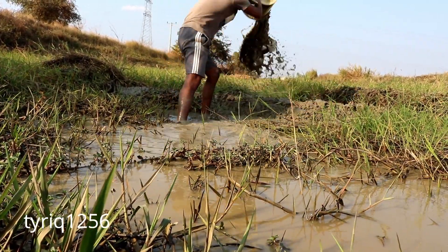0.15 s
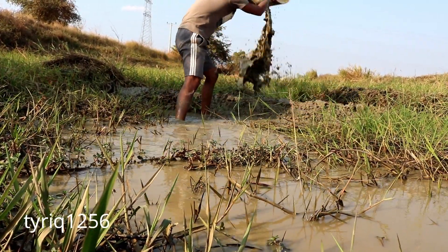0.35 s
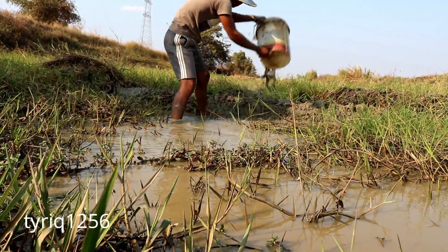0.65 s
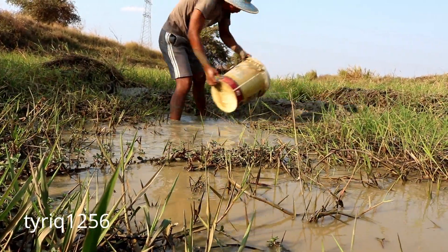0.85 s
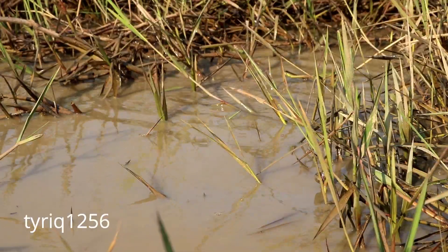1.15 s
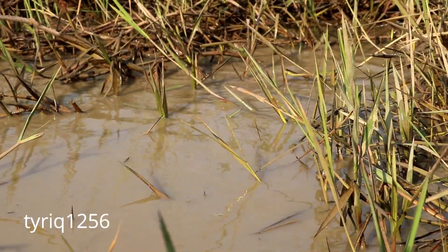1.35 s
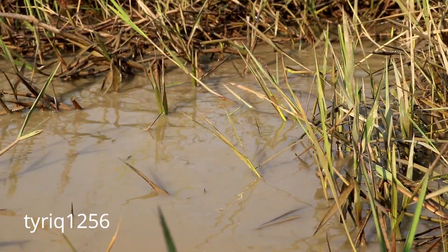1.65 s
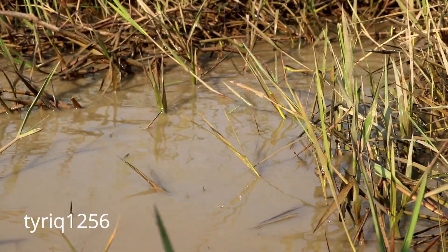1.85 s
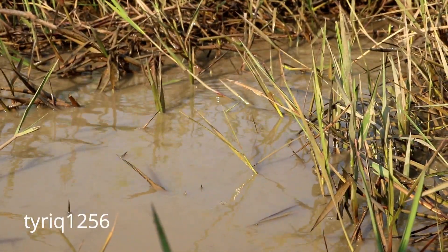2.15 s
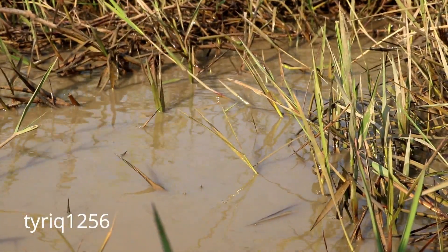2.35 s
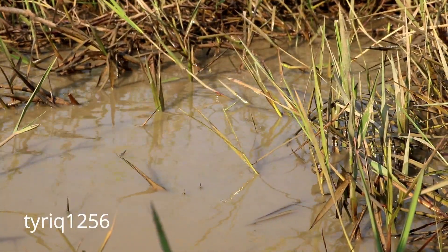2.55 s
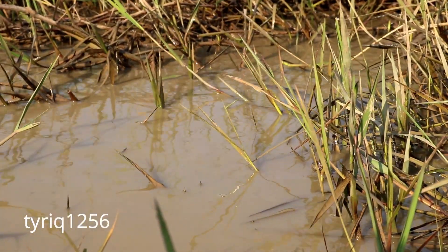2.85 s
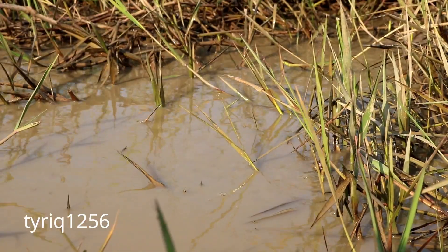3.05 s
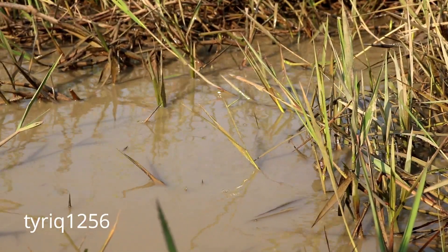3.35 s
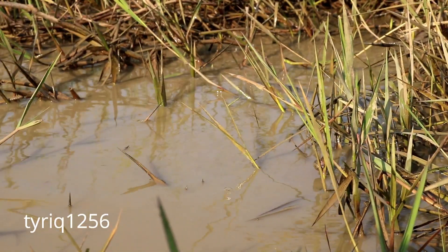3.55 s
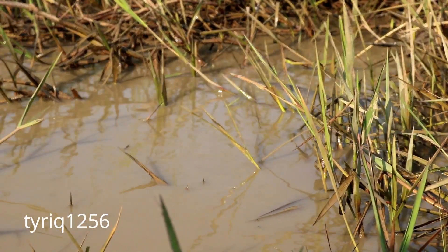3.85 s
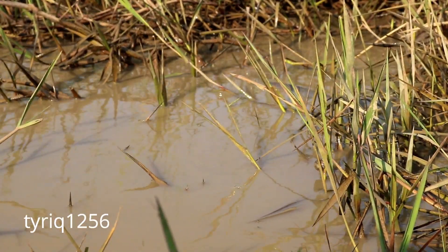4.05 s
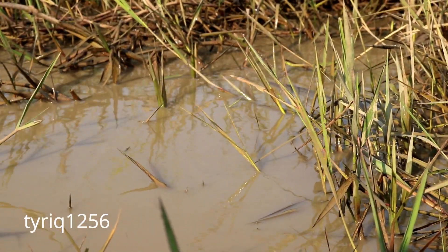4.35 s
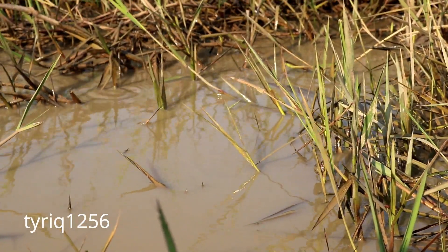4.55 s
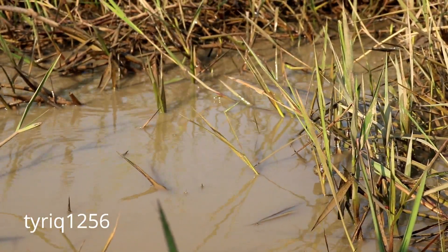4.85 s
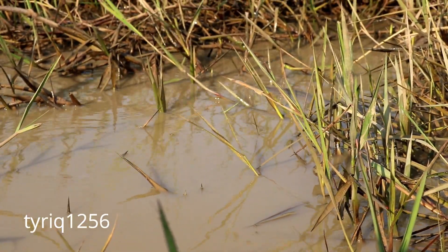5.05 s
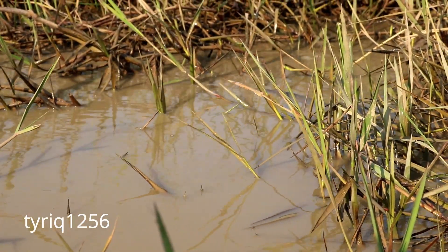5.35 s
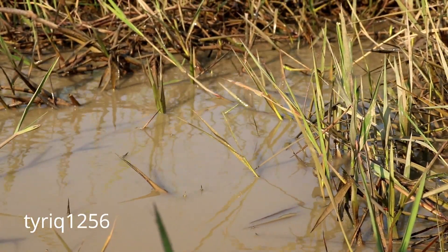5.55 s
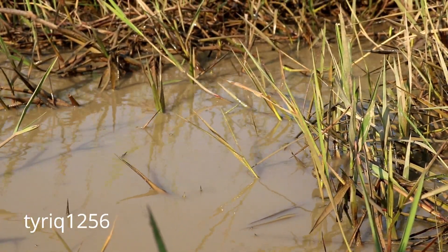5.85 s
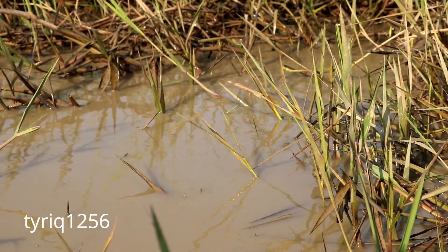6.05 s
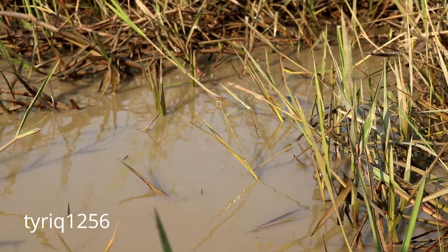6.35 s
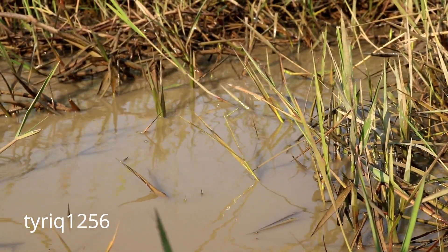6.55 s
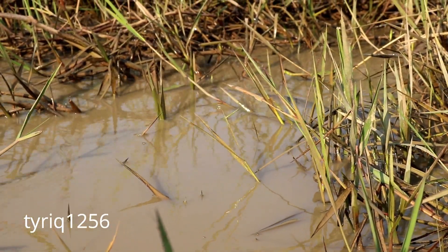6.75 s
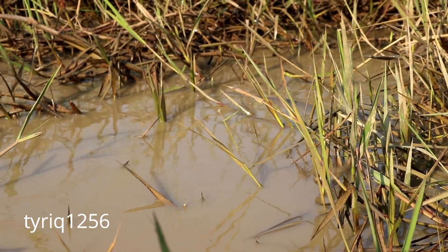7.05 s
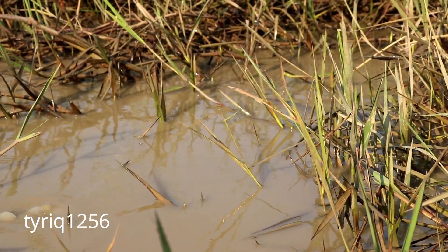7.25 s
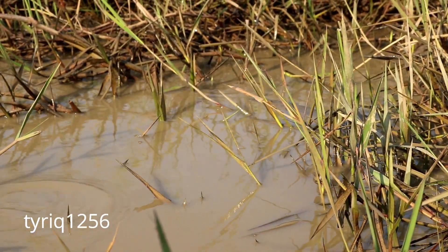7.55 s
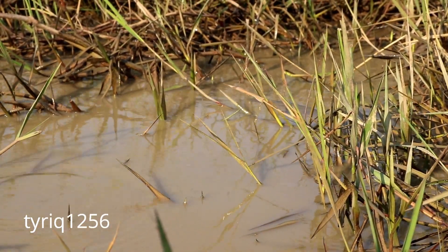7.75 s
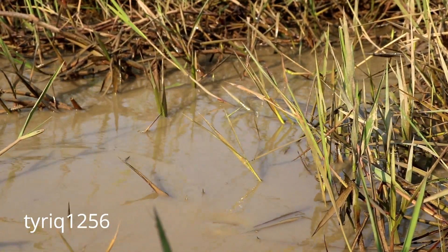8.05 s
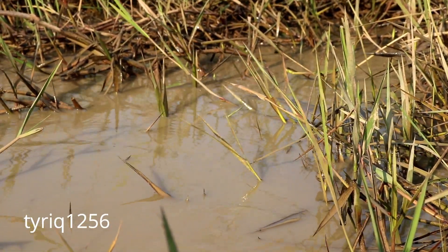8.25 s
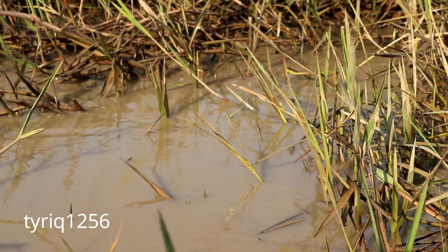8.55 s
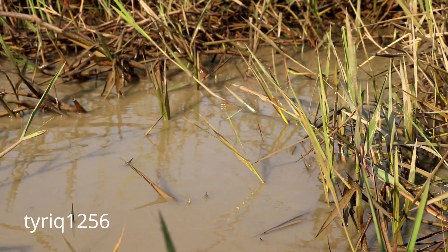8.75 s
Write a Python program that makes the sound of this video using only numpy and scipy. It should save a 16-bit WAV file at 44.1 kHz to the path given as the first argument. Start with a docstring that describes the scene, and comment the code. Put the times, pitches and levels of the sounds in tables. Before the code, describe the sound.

Water is thrown with a splash, then the bucket dips and gurgles, plops and drips before the next throw, five times over. Each splash swells quickly and thins into fizz and bubbles. Behind it a faraway engine chugs low and fast, fading and returning, over faint field hiss and uneven wind rumble. Outdoors, dry, close stereo pickup.

```python
"""A plastic bucket, close to the microphone, scoops muddy water from a shallow canal and throws it out.
Each load lands as a rush of bubbles and spray, built from thousands of short rising tones and noise.
Slaps and plops (trapped bubbles, churn and spray), droplet ticks and low thumps (air pockets) come in between.
Far off a one-cylinder engine putters past, each firing ringing its exhaust pipe.
Gusts rumble as shaped noise on the two ports of a small camera microphone; the open field hisses faintly."""
import sys
import numpy as np
from scipy import signal
from scipy.fft import rfft, irfft, next_fast_len
from scipy.io import wavfile
from scipy.ndimage import uniform_filter1d

SR = 44100
rng = np.random.default_rng(int(sys.argv[2]) if len(sys.argv) > 2 else 0)


def unload_wav(signal):
    """Save mono or channel-first audio to the path in sys.argv[1] as 16-bit WAV at rate SR, clipped to [-1, 1]."""
    wavfile.write(
        sys.argv[1],
        SR,
        np.round(np.clip(np.atleast_2d(signal).T, -1, 1) * 32767).astype(np.int16),
    )


N = 392917
TIME = np.arange(N) / SR


def gain_of(db):
    """Turns decibels into an amplitude factor."""
    return 10 ** (np.asarray(db) / 20)


def evened(x):
    """Scales a signal to rms 1."""
    return x / np.sqrt(np.mean(x ** 2) + 1e-20)


def read(points, hz):
    """Reads a spectrum table on a log-frequency axis."""
    table_hz, value = np.transpose(points)
    return np.interp(np.log(hz + 1), np.log(table_hz + 1), value)


def follow(rows):
    """Draws the columns of a timed table as curves, one value per sample."""
    time_s, *columns = np.transpose(rows)
    return [np.interp(TIME, time_s, column) for column in columns]


def coloured(x, points):
    """Filters a flat sound to the spectrum of a table and scales it to rms 1."""
    size = next_fast_len(N)
    hz = np.fft.rfftfreq(size, 1 / SR)
    spectrum = rfft(x, size) * gain_of(read(points, hz))
    return evened(irfft(spectrum, size)[..., :N])


def flicker(length_s):
    """Random curve of rms 1, smoothed twice over the given time."""
    size = max(int(length_s * SR), 2)
    once = uniform_filter1d(rng.standard_normal(N), size)
    return evened(uniform_filter1d(once, size))


def ring(hz, t60, rise_s, climb):
    """A dying tone whose pitch can climb, as a bubble's does when it nears the surface."""
    t = np.arange(int(t60 * SR) + 8) / SR
    tone = np.sin(2 * np.pi * hz * t * (1 + climb * t / t60))
    return tone * gain_of(-60 * t / t60) * (1 - np.exp(-t / rise_s))


def fade(t60):
    """Envelope of a splash: a quick rise and an exponential decay."""
    t = np.arange(int(t60 * SR) + 8) / SR
    return gain_of(-60 * t / t60) * (1 - np.exp(-t / .0022))


def add(mix, start_s, sound):
    """Mixes a sound in at a time, cut at the end of the mix."""
    part = mix[..., round(start_s * SR):][..., :sound.shape[-1]]
    part += sound[..., :part.shape[-1]]


def shape(start_s, corners_s, corners_db):
    """Power of an envelope drawn in dB through corners; -120 dB before and after."""
    return gain_of(2 * np.interp(TIME - start_s, corners_s, corners_db, -120, -120))


# loads thrown on the water: lands_s, swell_s, ends_s, front_db (relative to the height),
# bubbling_db and spray_db (at the height)
THROWS = [(0.312, 0.21, .95, -10.5, -20, -18), (1.502, .2, 2.04, -11.5, -21.5, -22),
          (3.798, .19, 4.265, -12, -22, -22.5), (5.83, 0.2, 6.29, -8.5, -20.5, -20.5),
          (8.075, 0.19, 8.58, -6, -21, -22.5)]
# water slopping round the bucket: start_s, rise_s, hold_s, drain_db_per_s, bubbling_db, spray_db
SLOSHES = [(-.1, 0.22, 0.11, 22, -43, -29), (0.78, 0.019, 0.074, 157, -34.5, -24.5),
           (0.952, 0.06, 0.041, 24, -33, -40), (1.965, 0.02, 0.016, 250, -37, -29),
           (2.05, 0.015, 0.017, 248, -35, -46), (2.122, 0.098, 0.069, 90, -30.5, -36.5),
           (2.598, 0.015, 0.064, 76, -34.5, -30), (2.711, 0.061, 0.08, 300, -28, -48),
           (2.852, 0.024, 0.54, 153, -33, -38), (3.0, 0.066, 0.072, 300, -29.5, -36.5),
           (3.555, 0.046, .02, 200, -33.5, -48), (4.222, .02, 0.01, 88, -31.5, -30.5),
           (4.522, 0.027, 0.049, 248, -32.5, -39), (4.686, 0.042, 0.32, 350, -32.5, -44),
           (5.093, 0.023, 0.28, 200, -31.5, -35.5), (5.384, 0.062, .02, 34, -35, -41),
           (6.19, 0.036, 0.021, 205, -28, -22), (6.27, 0.036, .02, 35, -33.5, -34.5),
           (6.457, .015, 0.05, 250, -58, -33), (6.73, 0.022, 0.022, 250.5, -38, -37),
           (6.826, 0.016, .21, 396, -30.5, -37), (7.06, 0.039, .15, 100, -39, -61),
           (7.053, 0.38, .08, 35, -29.5, -34.5), (8.029, 0.017, 0.16, 95, -58, -29),
           (8.51, .04, 0.04, 180, -36.5, -31.5), (8.577, 0.032, 0.048, 170, -42, -32.5),
           (8.782, 0.023, 0.026, 250, -42, -60)]
# each pair is (bubbling, spray)
STILL_DB = (-61, -46)  # the canal between throws and sloshes
THIN_DB_PER_S = (27, 49)  # how fast a load thins after its height
FRONT_S, STOP_S = 0.042, 0.14  # sudden front before the swell; final dying away


def water_levels():
    """Bubbling and spray levels in dB: the powers of still water, every throw and every slosh add up."""
    power = gain_of(2 * np.array(STILL_DB))[:, None] * np.ones(N)
    for k in range(2):
        for lands_s, swell_s, ends_s, front_db, *level_db in THROWS:
            height_db = level_db[k]
            length_s = ends_s - lands_s
            last_db = height_db - THIN_DB_PER_S[k] * (length_s - swell_s)
            corners_s = [0, FRONT_S, swell_s, length_s, length_s + STOP_S]
            corners_db = [height_db - 26, height_db + front_db, height_db, last_db, last_db - 50]
            power[k] += shape(lands_s, corners_s, corners_db)
        for start_s, rise_s, hold_s, drain_db, *level_db in SLOSHES:
            height_db = level_db[k]
            top_s = rise_s + hold_s
            corners_db = [height_db - 14, height_db, height_db, height_db - drain_db]
            power[k] += shape(start_s, [0, rise_s, top_s, top_s + 1], corners_db)
    return 10 * np.log10(power)


def grains(lo_hz, hi_hz, cycles, per_s, spread_db, climb, count=16):
    """Random ringing bubbles, equal energy per Hz; a few are much larger than the rest."""
    happens = rng.random(N) < per_s / SR
    size = gain_of(spread_db * np.minimum(rng.exponential(1, N), 4)) * happens
    kind = rng.integers(0, count, N)
    out = np.zeros(N)
    for k, hz in enumerate(np.geomspace(lo_hz, hi_hz, count)):
        bubble = ring(hz, cycles / hz, 1 / hz, climb)
        bubble *= np.sqrt(hz) / np.linalg.norm(bubble)
        out += signal.oaconvolve(size * (kind == k), bubble)[:N]
    return evened(out)


# spectrum of water slopping about: pitch_hz, level_db (relative, per Hz)
SLOPPING = [(260, -6), (450, -8), (1200, -3.5), (1450, -3.5), (1630, -3), (2200, -10), (3500, -15.5),
            (4550, -57), (7700, -120)]
# spectrum of a load landing: pitch_hz, level_db (relative, per Hz)
BUBBLING = [(210, -8), (350, -6.5), (817, 6.5), (962, -2.5), (1160, 7), (1560, 0), (1930, -10.5),
            (2250, -18.5), (2570, -11.5), (3500, -3), (4550, -48), (7700, -120)]
# spectrum of the spray: pitch_hz, level_db (relative, per Hz)
SPRAY = [(1060, -12), (1800, -9.5), (2240, -9), (2550, 2), (3030, -7.5), (3910, -1.5), (4880, -5),
         (6590, -4), (9500, -18), (12700, -21), (16000, -30.5)]
# spectrum of the first throw's spray, duller on top: pitch_hz, level_db (relative, per Hz)
FIRST_SPRAY = [(1060, -23), (1800, -4), (2180, -8), (2590, -5.5), (5640, -1), (8210, -16.5), (10600, -19.5),
               (16000, -39)]
FIRST_END_S = 0.9


def rush():
    """Separate bubbles while the water slops about; a dense, clumpy roar when a load lands."""
    bubbling_db, spray_db = water_levels()
    clumps, spatter = flicker(0.03), flicker(0.012)
    # 0 for slopping water, 1 for a landing load, by the bubbling level over a quarter second
    landing = np.clip((uniform_filter1d(bubbling_db, SR // 4) + 36.5) / 13.6, 0, 1)
    sparse = grains(500, 3300, 38, 650, 3.8, .2) + .3 * rng.standard_normal(N)
    plinks = coloured(sparse, SLOPPING)
    froth = coloured(grains(350, 3300, 30, 4200, 2.5, .25), BUBBLING)
    low = np.sqrt(1 - .9 * landing) * plinks + np.sqrt(landing) * froth
    fizz = grains(1900, 15500, 30, 2800, 3.8, .15) + 1.6 * rng.standard_normal(N)
    high = np.where(TIME < FIRST_END_S, coloured(fizz, FIRST_SPRAY), coloured(fizz, SPRAY))
    low *= gain_of(bubbling_db + 0.86 * clumps)
    high *= gain_of(spray_db + 1.55 * clumps + 1.4 * spatter)
    return low + high


# hiss of the open field: pitch_hz, level_db (relative, per Hz)
AIR = [(240, -19), (400, 0.5), (964, -2.5), (1220, 6), (2470, -3.5), (4650, -7.5), (10500, -10.5),
       (16000, -71)]


def field_air():
    """Steady hiss of the open field, as shaped noise."""
    return gain_of(-46.0) * coloured(rng.standard_normal(N), AIR)


# the engine passing: time_s, firings_per_s, peak_db (of a typical firing)
ENGINE = [(1.2, 15.26, -44), (1.6, 14.99, -30), (2.2, 15.86, -26), (2.7, 16.13, -26), (3.2, 16.26, -24),
          (3.5, 19.93, -18), (3.85, 21.44, -17.5), (4.8, 20.49, -18), (5.3, 20.02, -19), (5.65, 18.97, -22),
          (5.85, 18.84, -36), (6.6, 19.88, -40), (7.4, 18.88, -24), (8.0, 19.27, -22), (8.45, 19.43, -26),
          (8.9, 20.99, -23)]
# notes of the exhaust pipe: pitch_hz, level_db (relative), t60_s, rise_s
EXHAUST = [(132, 13, .044, .012), (265, -1, .022, .0006)]
START_TURN = .94  # share of the firing cycle already done at time zero


def engine():
    """Each firing knocks the exhaust pipe, whose low note swells and dies before the next."""
    per_s, peak_db = follow(ENGINE)
    turns = np.floor(START_TURN + np.cumsum(per_s) / SR)
    firings = np.diff(turns, prepend=turns[0])
    knocks = firings * gain_of(peak_db + 0.63 * rng.standard_normal(N))
    pipe = np.zeros(SR // 5)
    for hz, db, t60, rise_s in EXHAUST:
        add(pipe, 0, gain_of(db) * ring(hz, t60, rise_s, 0))
    return signal.oaconvolve(knocks, pipe / abs(pipe).max())[:N]


# air moving over the ports: time_s, level_db (before the lumps), left_over_right_db
WIND = [(0.0, -34, 1), (.25, -38.5, 15), (.74, -28.5, 0), (.97, -40.5, -0.5), (1.59, -35.5, 8),
        (1.76, -39, 2), (2.68, -39.5, 3), (2.85, -30, -5), (3.05, -38.5, 6), (3.35, -31, 6),
        (3.47, -35.5, 9), (3.8, -38, 8), (3.92, -28.5, -14), (4.09, -38.5, -1), (4.17, -26.5, -6),
        (4.42, -31, -7.5), (4.49, -23.5, -5.5), (4.64, -27, -14), (4.76, -32, -1), (5.06, -23, -1),
        (5.29, -28, -0.5), (5.8, -41, 4), (6.13, -32.5, -10), (6.43, -35, 13.5), (6.58, -35, -4),
        (7.12, -33, -6.5), (7.69, -23, -4), (7.94, -30, -5), (8.61, -28, -6), (8.71, -35.5, 20),
        (8.91, -25.5, -6)]
# spectrum of light air: pitch_hz, level_db (relative, per Hz)
RUMBLE = [(12, -40), (20, -20), (53, -0.5), (134, -3), (213, -5), (398, -21.5), (700, -32), (910, -59),
          (1540, -120)]
# spectrum of strong air: pitch_hz, level_db (relative, per Hz)
GUST = [(12, -58), (20, -46), (70, -4), (166, 2.5), (375, -4), (634, -24), (709, -19), (900, -19),
        (1170, -100), (1980, -120)]


def wind():
    """Lumpy rumble, only partly shared by the ports; the spectrum shifts as the air strengthens."""
    level_db, pan_db = follow(WIND)
    strong = np.clip((level_db + 32.5) / 13.4, 0, 1)
    noise = rng.standard_normal((2, 2, N))
    light_air = np.sqrt(1 - strong) * coloured(noise[0], RUMBLE)
    strong_air = np.sqrt(strong) * coloured(noise[1], GUST)
    left, own = light_air + strong_air
    pair = np.array([left, 0.73 * left + 0.97 * own])
    lumps_db = 4.3 * np.array([flicker(0.01), flicker(0.0092)])
    return pair * gain_of(level_db + lumps_db + np.outer([.5, -.5], pan_db))


# water slaps and plops: start_s, bubble_db, pitch_hz (of the bubble), churn_db, crack_db (of spray);
# levels are those before each part's rise and decay
SLAPS = [(0.186, -19, 1200, -28, -20), (0.523, -16, 1160, -10.5, -28), (0.735, -13, 1090, -17, -21),
         (0.814, -9, 747, -8, -21), (0.899, -15.5, 756, -27, -21), (1.385, -6, 2040, -18.5, -24.5),
         (1.675, -14, 710, -28, -28), (1.742, -10, 1165, -17, -34), (1.933, -13, 1640, -35, -26),
         (2.004, -11.5, 1650, -37, -25), (2.074, -27.5, 1380, -16, -28), (2.222, -12.5, 1300, -46, -42),
         (2.249, -14, 914, -39, -45), (2.389, -9.5, 1570, -46, -32), (2.469, -20.5, 1210, -47, -40),
         (2.514, -6, 1755, -29, -20), (2.605, -24, 1610, -15, -9), (2.684, -19.5, 598, -26, -36),
         (2.786, -12.5, 1590, -25, -45), (2.82, -17, 1240, -21, -40), (2.84, -12, 1190, -19, -26),
         (2.941, -26.5, 1280, -20, -29), (2.979, -19, 905, -24, -51), (3.083, -9, 1650, -39, -46),
         (3.133, -8.5, 1640, -35, -32), (3.613, -9, 2070, -24, -27), (3.812, -5, 2620, -26, -21),
         (3.92, -15, 1080, -33, -15), (4.029, -9, 810, -37, -36), (4.247, -12.5, 793, -15, -35),
         (4.475, -17.5, 610, -35, -38), (4.553, -12.5, 1330, -18, -13.5), (4.729, -12, 1570, -26, -48),
         (4.753, -11, 1080, -24, -43), (4.825, -5.5, 1950, -25, -39), (5.046, -17, 578, -34, -46),
         (5.116, -14, 877, -28, -39), (5.981, -15, 835, -25, -24), (6.199, -13, 830, -37, -32),
         (6.728, -12, 765, -17.5, -10.5), (6.842, -16, 1270, -29, -35), (6.958, -13, 1630, -27, -26.5),
         (8.036, -16, 2390, -59, -22), (8.258, -16, 680, -30, -17), (8.546, -14, 1256, -15, -26),
         (8.619, -11, 2480, -24, -20.5), (8.668, -38.5, 2500, -51, -17)]
KNOCK_OVER_CHURN_DB = 14.5


def slaps():
    """A knock, one trapped bubble (small ones die sooner), churned water and a crack of spray."""
    pops, churn, crack = np.zeros((3, N))
    for start_s, bubble_db, hz, churn_db, crack_db in SLAPS:
        bubble = ring(hz, 34.4 / hz, 0.0012, 0.068)
        knock = ring(2100, 0.0018, 0.00014, 0)
        add(pops, start_s, gain_of(bubble_db) * bubble)
        add(pops, start_s, gain_of(churn_db + KNOCK_OVER_CHURN_DB) * knock)
        add(churn, start_s, gain_of(churn_db) * fade(0.072))
        add(crack, start_s, gain_of(crack_db) * fade(0.056))
    water, spray = rng.standard_normal((2, N))
    return pops + churn * coloured(water, SLOPPING) + crack * coloured(spray, SPRAY)


# thumps: start_s, level_db (before the rise), pitch_hz, t60_s, left_over_right_db
THUMPS = [(0.361, -25, 126, 0.1, -14), (0.813, -12, 146, 0.12, -4), (0.901, -13, 256, 0.09, 2),
          (1.1, -18.5, 219, 0.15, -0.5), (1.393, -21.5, 143, 0.24, 5), (2.076, -14, 268, 0.088, 1),
          (2.795, -12.5, 138, 0.14, -6), (2.942, -1.5, 172, 0.056, 1.0), (3.321, -7.5, 262, 0.085, 0),
          (3.362, -14, 222, 0.13, 0), (3.913, -12.5, 140, 0.1, -17), (4.252, -5.5, 144, 0.059, -8),
          (4.471, -16, 148, 0.12, -14), (4.481, -9, 291, 0.044, -14), (4.529, -13, 162, 0.07, -15),
          (4.611, -9, 253, 0.05, -21), (4.632, -6.5, 200, 0.032, -17), (4.868, -6, 137, 0.042, -9),
          (4.943, -8, 150, 0.04, -8), (4.971, -9, 252, 0.094, -14), (5.006, -10, 298, 0.05, -8),
          (5.038, -1.5, 246, 0.037, -12), (5.278, -15, 149, 0.094, 7), (6.412, -10, 232, 0.024, 19),
          (7.263, -11, 202, 0.077, -18), (7.336, -1.5, 140, 0.06, -11), (7.59, -2.5, 201, 0.043, -11),
          (7.677, -4.5, 150, 0.088, -2), (7.756, -0.5, 104, 0.051, -8), (7.816, -14, 136, 0.082, 0),
          (7.853, -9, 260, 0.051, -14), (8.544, -11, 254, 0.065, -2.0), (8.834, -3, 115, 0.048, 6)]


def thumps():
    """Large air pockets and buffets: a blunt front and a few low cycles."""
    out = np.zeros((2, N))
    for start_s, level_db, hz, t60, pan_db in THUMPS:
        sides = gain_of(level_db + np.array([[pan_db], [-pan_db]]) / 2)
        add(out, start_s, sides * ring(hz, t60, 0.0056, 0.15))
        # a short, higher knock just after the front
        add(out, start_s + 0.0038, sides * gain_of(0.5) * ring(403, 0.0091, 0.0019, 0))
    return out


# single droplets ticking on leaves and water: start_s, level_db (before the rise and decay)
TICKS = [(0.9283, -15), (1.274, -21), (2.154, -24), (2.1987, -17.5), (2.243, -15), (2.2904, -12.5),
         (2.3555, -20.5), (2.75, -15), (3.039, -24), (3.238, -19), (4.339, -17), (4.4034, -20),
         (4.4387, -16.5), (4.543, -9.5), (4.589, -15), (4.7113, -20), (4.8447, -18), (5.007, -23),
         (5.3033, -19), (6.382, -19), (6.555, -20.5), (7.693, -21), (8.6613, -9), (8.718, -22.5)]
FAINT_PER_S, FAINT_DB = 3.2, -26.5  # smaller droplets at random: rate, middle level


def droplets():
    """Tiny drops lack body: each is a short burst of spray noise above 5 kHz."""
    tick = np.zeros(N)
    for start_s, level_db in TICKS:
        add(tick, start_s, gain_of(level_db) * fade(0.023))
    happens = rng.random(N) < FAINT_PER_S / SR
    faint = happens * gain_of(FAINT_DB + 7.1 * rng.standard_normal(N))
    tick += signal.oaconvolve(faint, fade(0.019))[:N]
    highpass = signal.butter(2, 5000, "high", fs=SR, output="sos")
    return tick * evened(signal.sosfilt(highpass, coloured(rng.standard_normal(N), SPRAY)))


# level difference of the two ports: pitch_hz, left_over_right_db
PORT_BALANCE = [(400, 0), (1300, 0), (2400, 1.1), (4400, 2.5), (8100, 6.5), (15000, 10)]
# how alike the two ports hear: pitch_hz, likeness (0 to 1)
PORT_SAME = [(400, .94), (1200, .93), (2500, .76), (5000, .8), (9000, .62), (14000, .45)]
RIGHT_LAG_S = 8.5e-5


def ports(x):
    """Two close ports: the right one hears later, duller and partly by ever changing scattered paths."""
    cells = signal.stft(x, nperseg=128, noverlap=96)[2]
    turned = cells * np.exp(2j * np.pi * rng.random(cells.shape))  # random phase in every cell
    scattered = signal.istft(turned, nperseg=128, noverlap=96)[1][:N]
    size = next_fast_len(N + 256)
    hz = np.fft.rfftfreq(size, 1 / SR)
    same = np.clip(read(PORT_SAME, hz), 0, 1)
    half = gain_of(read(PORT_BALANCE, hz) / 2)
    direct = rfft(x, size)
    right = same * direct + np.sqrt(1 - same ** 2) * rfft(evened(scattered) * x.std(), size)
    lag = np.exp(-2j * np.pi * hz * RIGHT_LAG_S)
    return irfft([direct * half, right * lag / half], size)[:, :N]


def scene():
    """Water and the hiss of the open field through the port pair, then engine, thumps and wind."""
    through_ports = rush() + slaps() + droplets() + field_air()
    return ports(through_ports) + engine() + thumps() + wind()


def record(dry):
    """The microphone drops the deepest bass and rounds the highest peaks; then the band limit."""
    dry = signal.sosfilt(signal.butter(2, 45, "high", fs=SR, output="sos"), dry)
    dry = .95 * np.tanh(dry / .95)
    band = signal.firwin(511, 15950, window=("kaiser", 9), fs=SR)  # low-pass edge in Hz
    return signal.oaconvolve(dry, band[None], "same")


dry = scene()
out = record(dry)
unload_wav(out)
```